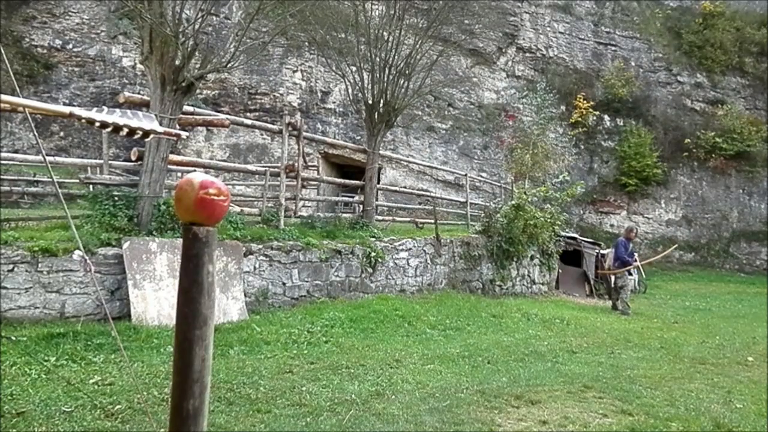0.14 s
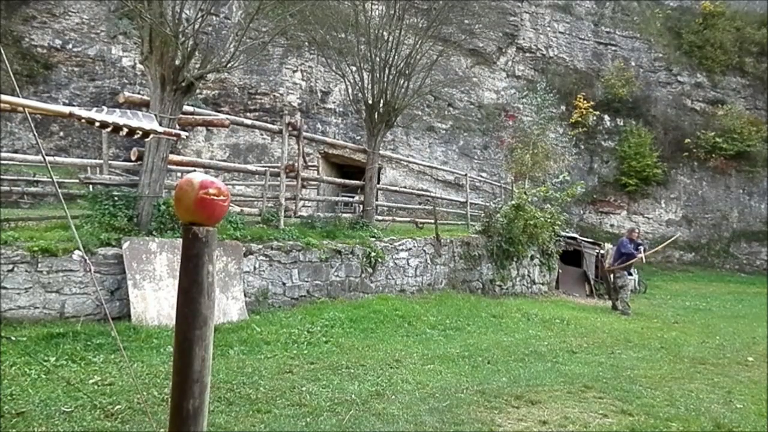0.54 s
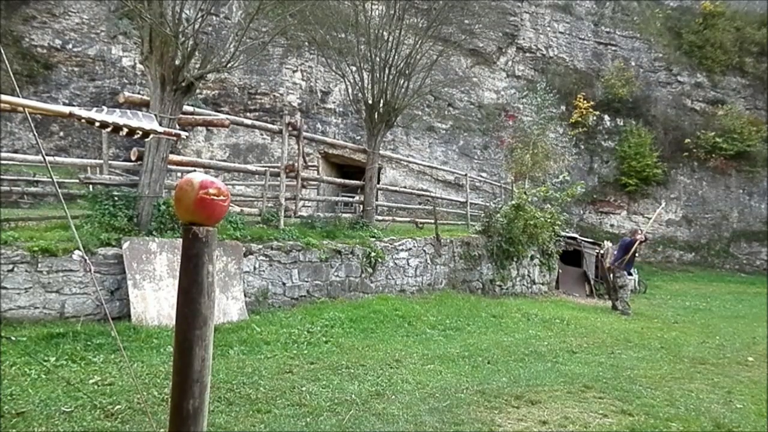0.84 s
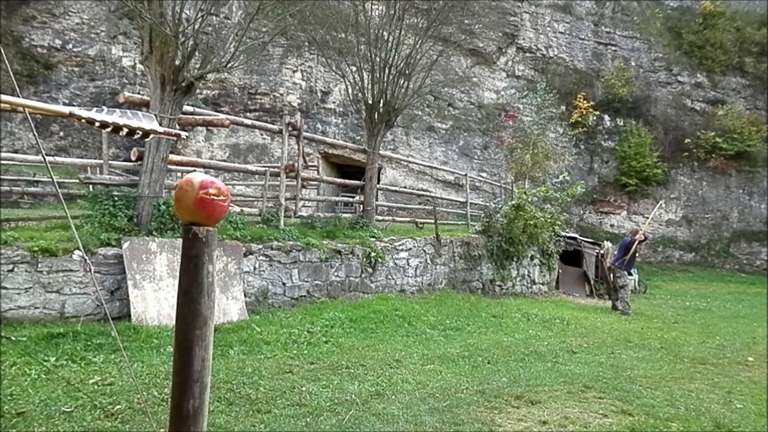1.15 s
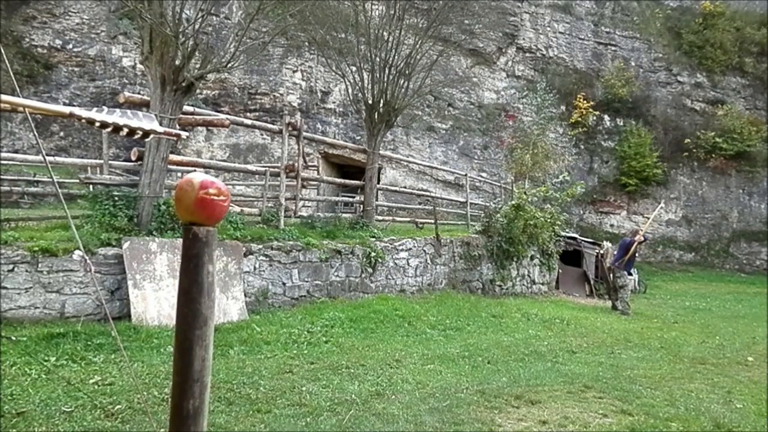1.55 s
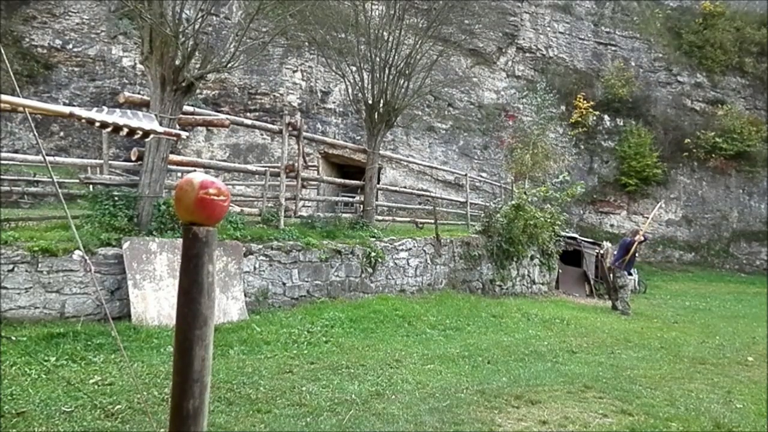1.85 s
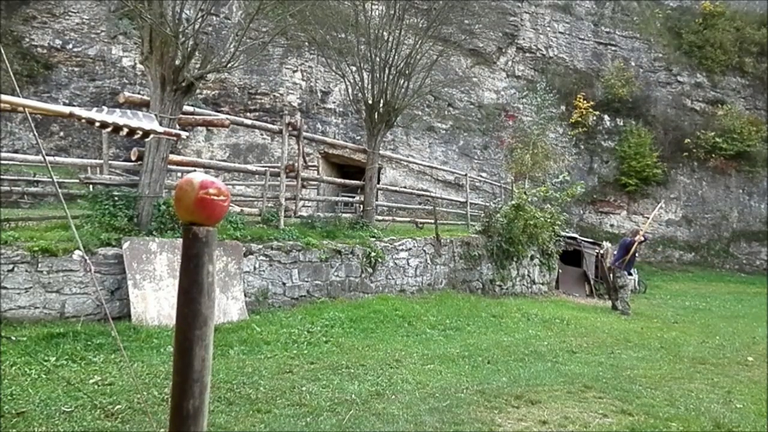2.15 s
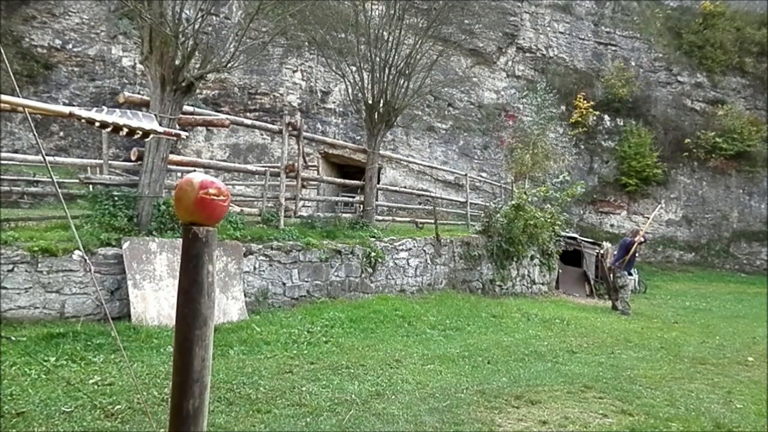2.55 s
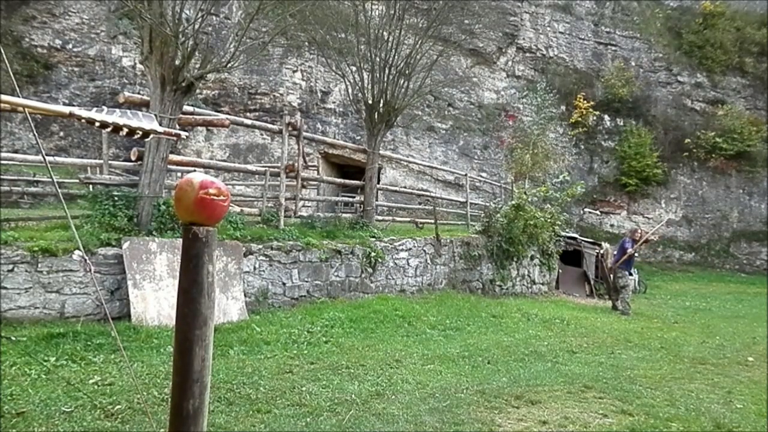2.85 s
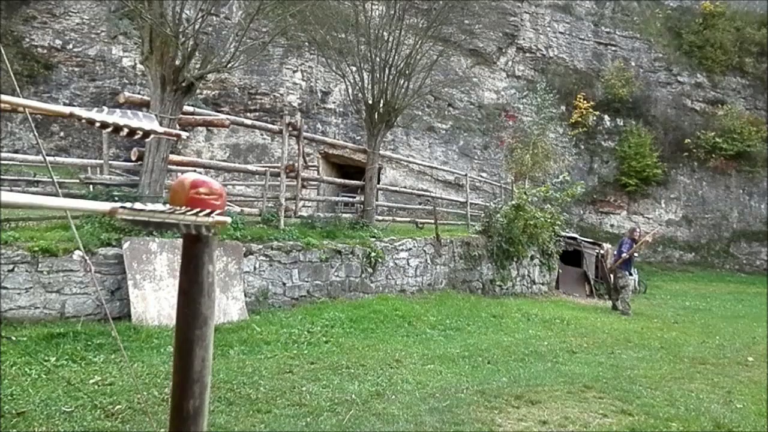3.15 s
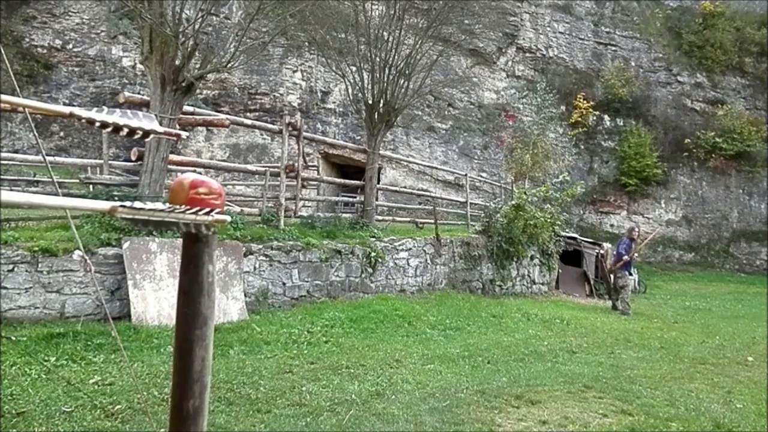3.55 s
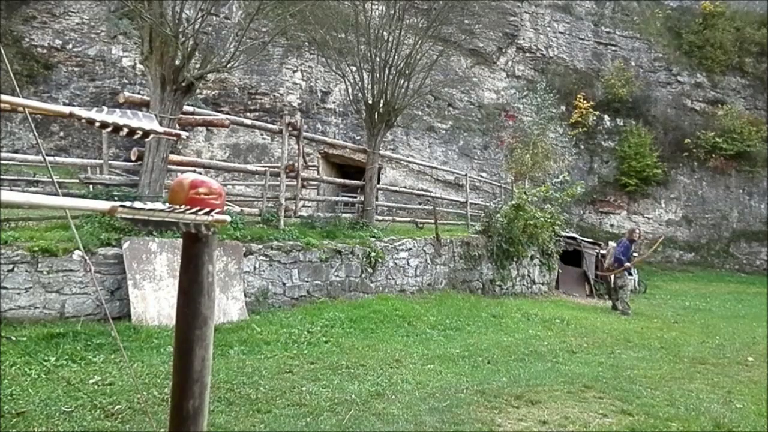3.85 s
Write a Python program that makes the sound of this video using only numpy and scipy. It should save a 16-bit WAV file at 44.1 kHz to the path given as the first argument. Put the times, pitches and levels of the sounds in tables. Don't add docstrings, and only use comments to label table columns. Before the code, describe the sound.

An arrow strikes a wooden post about a metre from a camera microphone outdoors. Low wind and rumble run beneath faint high whine and regular tiny focus ticks; a barely audible tap comes at 1.4 s. At 2.7 s a distant bow knocks dully, fletching hisses nearer, and at 3.0 s a loud crack and thud lands. Small slaps follow until 3.08 s, with thin treble scatter; the background drops, then slowly creeps back.

```python
import sys
import numpy as np
from scipy import signal
from scipy.fft import rfft, irfft
from scipy.io import wavfile
from scipy.ndimage import uniform_filter1d, minimum_filter1d

SR = 44100
rng = np.random.default_rng(int(sys.argv[2]) if len(sys.argv) > 2 else 0)


def boost_factor(decibels):
    exponent = np.asarray(decibels, float) / 20
    return 10 ** exponent


def to_wav(sig):
    pcm = np.clip(np.atleast_2d(sig), -1, 1) * 32767
    pcm = np.round(pcm).astype(np.int16)
    wavfile.write(sys.argv[1], SR, pcm.T)


N = 176400
T = np.arange(N) / SR

# frequency in Hz, level in dB per Hz.
WIND_SPECTRUM = [(12, -59.5), (20, -19), (38, -4.5), (135, 1), (290, -3), (676, -10.5), (1190, -28.5),
                 (2280, -34), (3600, -44), (4680, -80.5), (7920, -120)]
# frequency in Hz, level in dB per Hz.
HISS_SPECTRUM = [(2500, -14), (4500, -9.5), (6000, -10), (8000, -10), (10500, -12), (12500, -7.5),
                 (14000, -4), (15000, 0)]
# middle in seconds, length in seconds, pitch in Hz, level in dB.
WHINE_BURSTS = [(.004, .006, 14890, -71), (.0053, .011, 15355, -67.5)]
# time in seconds, level in dB.
FOCUS_EFFORT = [(0, -55), (.42, -56), (.55, -55.5), (.63, -69.5), (.72, -61), (.95, -61.5), (1.15, -64.5),
                (1.28, -62.5), (1.55, -63.5), (1.81, -57), (2.22, -54.5), (2.35, -56), (2.42, -96),
                (2.5, -51.5), (2.62, -69), (2.9, -69.5), (3.66, -72), (3.76, -52.5), (4, -56)]
# frequency in Hz, level in dB, 60 dB decay in seconds.
BARREL_MODES = [(4750, -2, .009), (6000, -5, .008), (7300, -4, .007), (7950, -3, .006), (8550, -3, .006)]
# crest in seconds, peak in dB, pitch in Hz, rise in seconds, 60 dB decay in seconds.
KNOCKS_AND_RINGS = [(2.6921, -27.5, 215, .0013, .031), (2.6996, -30, 205, .0041, .061),
                    (2.7, -36, 66, .0061, .16), (2.6968, -37, 640, .002, .05), (2.7125, -39, 130, .008, .15),
                    (2.678, -44, 480, .004, .09), (2.9938, -21, 400, .001, .016), (2.999, -15, 245, .0046, .02),
                    (2.9937, -21, 155, .001, .05), (2.9972, -36, 45, .004, .3), (3.0003, -31, 670, .003, .03),
                    (3.0092, -18.5, 275, .0016, .028), (3.017, -31, 130, .004, .13),
                    (3.029, -35, 330, .001, .05), (3.0775, -36, 520, .001, .055),
                    (2.7045, -33, 9800, .0004, .005),
    (2.7045, -42, 7300, .0004, .006),
    (2.7045, -47, 4000, .0004, .006),
    (2.9933, -20, 14700, .0004, .009),
    (2.9933, -26, 8700, .0003, .007),
    (2.9933, -26, 6400, .0003, .007),
    (2.995, -26, 6200, .0003, .008),
    (2.995, -27, 8500, .0003, .008),
                    (2.9778, -36.5, 200, 0.0033, 0.024), (2.9957, -27.5, 770, 0.0018, 0.036),
              (3.007, -33.5, 589, 0.0033, 0.03), (3.0278, -37.5, 4300, 0.00051, .006),
              (3.0278, -39.5, 2900, .0003, .008), (3.0285, -49.5, 1325, .001, .04),
              (3.029, -40, 559, 0.0011, .03), (3.0771, -43, 1300, .0005, .04),
              (3.07643, -31, 3100, .0002, .0035), (3.0815, -48, 2300, .0005, .012),
              (3.0768, -45, 850, .001, .06), (2.6735, -50, 2840, 0.00045, .025),
              (2.6745, -47.5, 1350, 0.00083, .03), (2.694, -48, 1070, 0.0025, .06),
              (1.4155, -54, 1600, .002, 0.014), (1.419, -60, 2000, .002, .015),
              (1.4145, -56, 970, 0.0017, .02)]
# start in seconds, rms
# level in dB, 60 dB decay in seconds, share of dull colour from 0 to 1.
CRACK_BURSTS = [
    (2.673, -55, 0.086, 0.84),
    (2.693, -44, 0.096, 0.31),
    (2.707, -44, 0.025, 0.4),
    (2.993, -29.5, 0.019, 0.1),
    (2.9966, -28, 0.029, 0.2),
    (2.999, -41.5, 0.034, 0),
    (3.004, -84.5, 0.44, 0.2),
                (3.0276, -42, .008, 1),
    (3.0763, -50, .005, .3),
    (3.077, -53, .04, 1),
    (3.03, -63, .8, .1),
    (2.712, -60, .25, 1),
]
# frequency in Hz, width in Hz, level in dB.
BRIGHT_MODES = [(4120, 740, -2), (6250, 100, 1.5), (7150, 1500, 9.5), (8300, 690, 14), (9800, 1600, 7),
                (15100, 720, 3)]
# frequency in Hz, width in Hz, level in dB.
DULL_MODES = [(1200, 900, -5), (2600, 1000, 0), (3600, 1300, -1), (5200, 1800, -9)]
# frequency in Hz, level in dB per Hz.
FLETCHING = [(1100, -14), (2000, -13), (5180, -18), (5840, -15.5), (7110, -16.5), (8290, -9.5),
             (11600, -15.5), (15500, -6)]
# frequency in Hz, width in Hz, level in dB.
QUIVER_MODES = [(4600, 60, -2), (6200, 90, 0), (7000, 50, -5), (8400, 90, -2), (8900, 80, -3)]
# frequency in Hz, level in dB per line.
SILENCE_LINE = [(600, -50), (1000, -41.5), (3500, -43.5), (4200, -42), (9100, -43), (9600, -39),
                (12500, -42), (14600, -41), (14950, -49), (15300, -41)]

FIELD_HZ = 60 / 1.001
LOOSE_S, STRIKE_S = 2.69, 2.993


def rms_one(x):
    return x / np.sqrt(np.mean(x ** 2) + 1e-20)


def drift(rate):
    r = np.exp(-80 * np.pi * rate / SR)
    slow = signal.lfilter([1], [1, -2 * r, r * r], rng.standard_normal(N // 40 + 2002))[2000:]
    return np.interp(np.arange(N) / 40, np.arange(len(slow)), rms_one(slow))


def coloured(spectrum, patchy_db):
    hz, db = np.transpose(spectrum)
    together = drift(2.0)
    white = rng.standard_normal((2, N + 8000))
    edges = hz[0] * 2 ** np.arange(0, np.log2(hz[-1] / hz[0]) + .25, .5)
    out = 0
    for k, (low, high) in enumerate(zip(edges, np.minimum(edges[1:], 18000))):
        sos = signal.butter(2, [low, high], "band", fs=SR, output="sos")
        band = signal.sosfilt(sos, white[k % 2])[-N:]
        level = np.interp(np.log(low * high) / 2, np.log(hz), db)
        out = out + band * boost_factor(level + patchy_db * (0.87 * together + drift(12)))
    return rms_one(out)


def shaped(spectrum):
    hz, db = np.transpose(spectrum)
    f = np.arange(N // 2 + 1) * SR / N + 1
    level = np.interp(np.log(f), np.log(hz), db, left=-60) - 60 * (f > 16000)
    return rms_one(irfft(rfft(rng.standard_normal(N)) * boost_factor(level), N))


def wind():
    return boost_factor(-49.5) * coloured(WIND_SPECTRUM, patchy_db=1.0)


def microphone_hiss():
    return boost_factor(-71.7) * shaped(HISS_SPECTRUM)


def whine():
    field, since_field = np.divmod(T, 1 / FIELD_HZ)
    u = since_field - .0051
    out = boost_factor(-75) * np.cos(2 * np.pi * 249.5 * FIELD_HZ * u)
    for middle, length, hz, db in WHINE_BURSTS:
        gate = np.cos(np.pi * np.clip((since_field - middle) / length, -.5, .5))
        out = out + boost_factor(db) * gate * np.cos(2 * np.pi * hz * u)
    return out * (-1) ** field * boost_factor(1.5 * drift(24))


def ring(clicks, hz, t60):
    r, w = boost_factor(-60 / (t60 * SR)), 2 * np.pi * hz / SR
    return signal.lfilter([0, np.sin(w)], [1, -2 * r * np.cos(w), r * r], clicks + 1e-18)


def focus_motor():
    s = .0138 + np.arange(60) * 4 / FIELD_HZ
    luck = rng.standard_normal((60, len(BARREL_MODES) + 1))
    effort_db = np.interp(s, *np.transpose(FOCUS_EFFORT)) + .7 * luck[:, -1]
    out = 0
    for k, (hz, level_db, t60) in enumerate(BARREL_MODES):
        clicks = np.zeros(N)
        clicks[(s * SR).astype(int)] = boost_factor(effort_db + level_db - 7 + 3.0 * luck[:, k])
        second = 1.1 * np.roll(clicks, int(0.001 * SR))
        out = out + ring(clicks + second, hz, t60)
    return out


def knocks():
    out = 0
    for s, db, hz, rise, t60 in KNOCKS_AND_RINGS:
        swell = np.cos(np.pi / 2 * np.clip((s - T) / rise, 0, 1)) ** 2
        decay = boost_factor(db - 60 * np.clip(T - s, 0, 1) / t60)
        out = out + swell * decay * np.cos(2 * np.pi * hz * (T - s))
    return out


def dying(s, db, t60):
    return (T >= s) * boost_factor(db - 60 * np.clip(T - s, 0, 4 * t60) / t60)


def resonant(peaks):
    white = rng.standard_normal(N)
    out = 0
    for k, (hz, width, db) in enumerate(peaks):
        out = out + (-1) ** k * boost_factor(db) * np.sqrt(width) * ring(white, hz, 0.99 / width)
    return rms_one(out)


def cracks():
    bright, dull = resonant(BRIGHT_MODES), resonant(DULL_MODES)
    out = 0
    for s, db, t60, share in CRACK_BURSTS:
        out = out + dying(s, db, t60) * (share * dull + (1 - share) * bright)
    return out


def arrow_flight():
    post_m, speed_m_s, db_at_1m = 1.1, 36, -48.5
    distance = post_m + speed_m_s * np.abs(STRIKE_S - T)
    flying = (T > LOOSE_S) * (T < STRIKE_S)
    return flying * boost_factor(db_at_1m + 0.5 * drift(5)) / distance * shaped(FLETCHING)


def rock_face():
    sos = signal.butter(4, 11300, "high", fs=SR, output="sos")
    thin = signal.sosfilt(sos, rng.standard_normal(N))
    swell = 1 - np.exp(-np.abs(T - STRIKE_S) / .07)
    end = boost_factor(-300 * np.clip(T - 3.27, 0, 1))
    return dying(STRIKE_S, -48, 8) * end * swell * thin


def quiver():
    end = boost_factor(-300 * np.clip(T - 3.23, 0, 1))
    return dying(3.08, -66 + 1.7 * drift(20), 8) * end * resonant(QUIVER_MODES)


def scene():
    around = wind() + microphone_hiss() + whine() + focus_motor()
    shot = knocks() + cracks() + arrow_flight() + rock_face() + quiver()
    return (around + shot)[None]


def gain_control(x):
    threshold_db, share, hold_s, release_db_s, attack_s = -32.5, 1.13, 0.3, 18.5, 0.068
    level = 10 * np.log10(uniform_filter1d(x ** 2, size=220) + 1e-12)
    hold = int(hold_s * SR)
    held = -minimum_filter1d(-level, size=hold, origin=(hold - 1) // 2)
    released = np.maximum.accumulate(held + release_db_s * T) - release_db_s * T
    r = np.exp(-1 / (attack_s * SR))
    duck = signal.lfilter([1 - r], [1, -r], share * np.maximum(released - threshold_db, 0))
    return x * boost_factor(-duck)


def starve(x):
    top_hz, top_db, jitter_db = 15760, -26, 1.2
    window = np.sin(np.pi * (np.arange(2048) + .5) / 2048)
    f, _, z = signal.stft(x, SR, window, 2048, 1024, scaling="spectrum")
    low_band = 26 * np.log(1 + f / 1200)
    high_band = 80 + (f - 9000) / 345 + 100 * (f > top_hz)
    band = np.where(f < 9000, low_band, high_band).astype(int)
    hz, db = np.transpose(SILENCE_LINE)
    for b in np.unique(band):
        rows = band == b
        mid = f[rows].mean()
        line = top_db if mid > top_hz else np.interp(np.log(mid + 1), np.log(hz), db)
        energy = np.abs(z[rows]) ** 2
        power = 10 * np.log10(np.mean(energy, axis=0) + 1e-30) + 60
        z[rows] *= 10 * np.log10(energy + 1e-30) + 60 > line
        z[rows] *= power > line + jitter_db * rng.standard_normal(z.shape[1])
    return signal.istft(z, SR, window, 2048, 1024, scaling="spectrum")[1][:N]


def roll_off(x):
    return signal.sosfilt(signal.butter(12, 16840, fs=SR, output="sos"), x)


def record(dry):
    mix = starve(gain_control(dry[0]))[None]
    return roll_off(mix)


dry = scene()
out = record(dry)
to_wav(out)
```